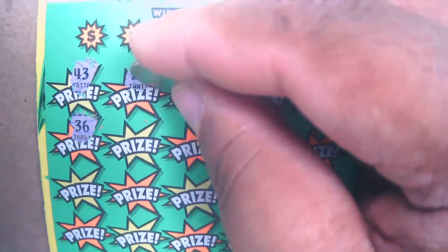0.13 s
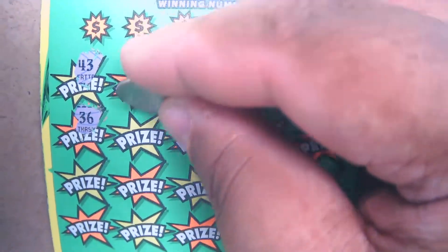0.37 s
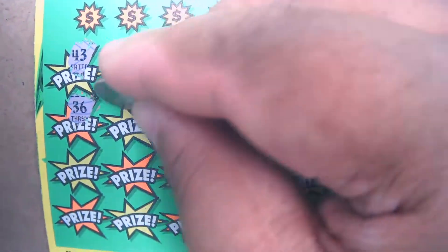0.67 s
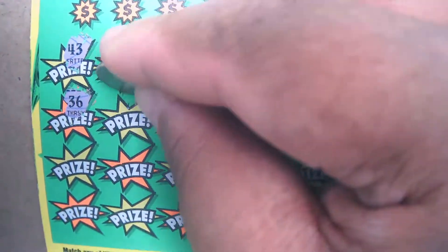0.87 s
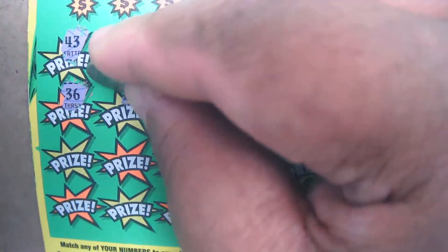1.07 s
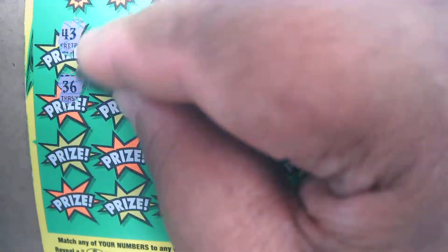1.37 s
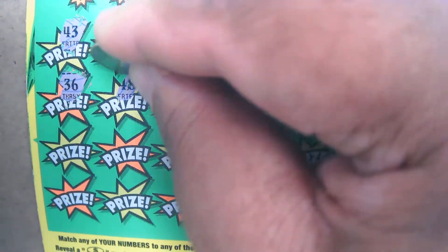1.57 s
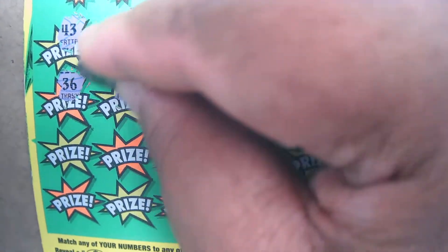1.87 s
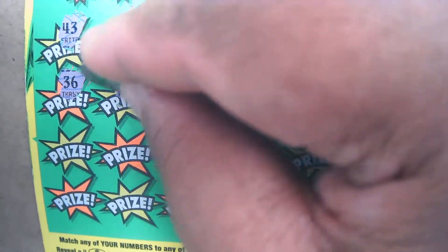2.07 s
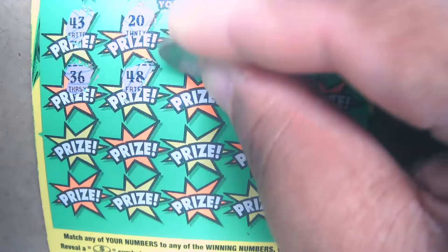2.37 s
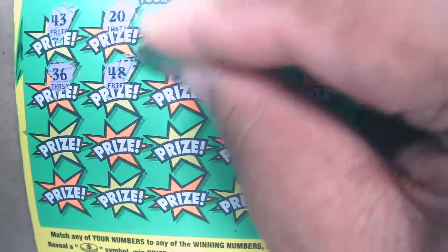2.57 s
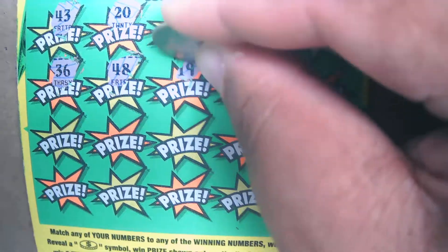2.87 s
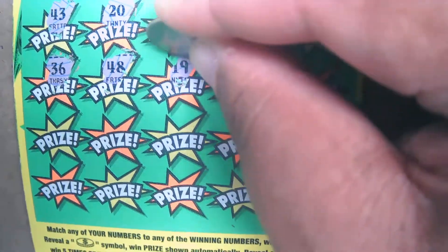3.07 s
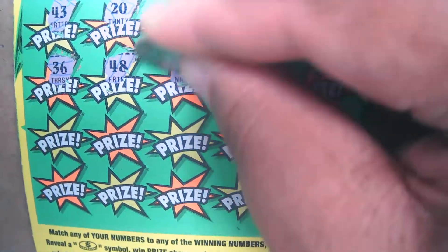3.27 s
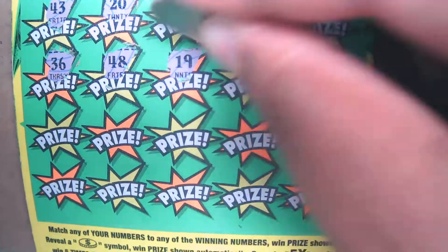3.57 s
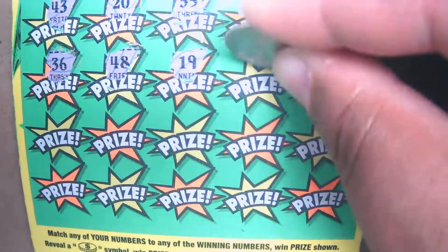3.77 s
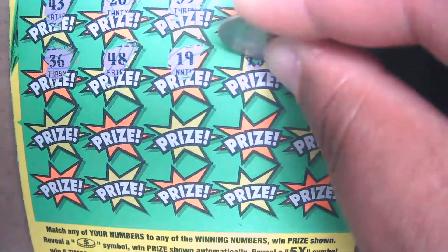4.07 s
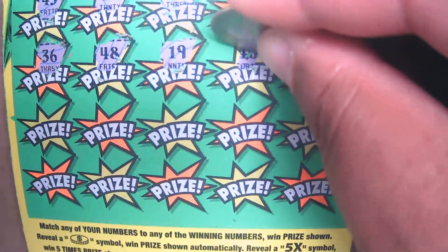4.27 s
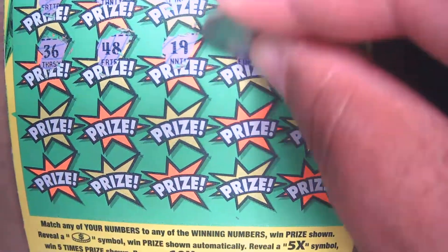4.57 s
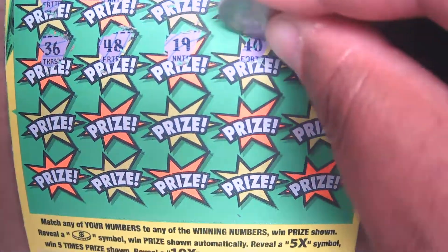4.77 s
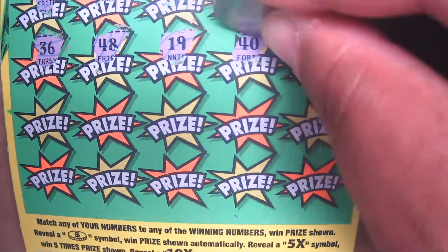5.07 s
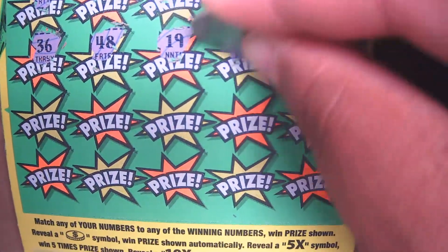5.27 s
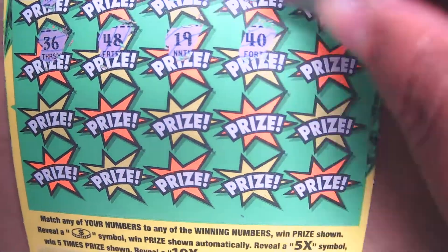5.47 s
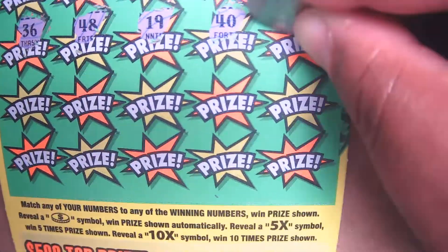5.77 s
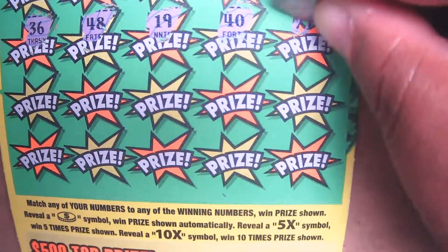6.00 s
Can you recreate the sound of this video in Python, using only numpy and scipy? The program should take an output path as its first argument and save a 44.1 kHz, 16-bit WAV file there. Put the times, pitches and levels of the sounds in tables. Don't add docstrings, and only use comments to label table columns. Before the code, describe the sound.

Very close to a phone microphone, a coin scratches the coating off a card ticket on a table. After a near-quiet start, quick paired strokes, a softer drag then a harder dig, come in several bursts separated by short gaps. Taps mark many burst starts, gritty crumbs hiss, the card rings woody in the midrange, and low ventilation hum lies beneath.

```python
import sys
import numpy as np
from scipy import signal
from scipy.fft import rfft, irfft
from scipy.io import wavfile
from scipy.ndimage import uniform_filter1d

SR = 44100
rng = np.random.default_rng(int(sys.argv[2]) if len(sys.argv) > 2 else 0)


def convert_level_to_amplitude(level_db):
    exponent = np.asarray(level_db, float) / 20
    return 10 ** exponent


def dump(signal):
    limited = np.clip(np.atleast_2d(signal).T, -1, 1)
    pcm = np.round(limited * 32767).astype(np.int16)
    wavfile.write(sys.argv[1], SR, pcm)


N = 270597
TIME = np.arange(N) / SR
SCATTER = irfft(np.exp(2j * np.pi * rng.random(33)))


def level(x, db):
    return x * convert_level_to_amplitude(db) / np.sqrt(np.mean(x ** 2))


def noise():
    return rng.standard_normal(N)


def ring(x, hz, width_hz):
    return signal.lfilter(*signal.iirpeak(hz, hz / width_hz, SR), x)


def band(x, lo_hz, hi_hz):
    return signal.sosfilt(signal.butter(4, [lo_hz, hi_hz], "band", fs=SR, output="sos"), x)


def colour(x, points):
    hz, db = np.transpose(points)
    grid_hz = np.fft.rfftfreq(8192, 1 / SR)
    curve_db = np.interp(np.log(grid_hz + 1), np.log(hz), np.maximum(db, -90))
    cepstrum = irfft(np.log(convert_level_to_amplitude(curve_db)))
    cepstrum[1:4096] *= 2
    cepstrum[4097:] = 0
    impulse = irfft(np.exp(rfft(cepstrum)))
    return signal.fftconvolve(x, impulse)[:N]


def slips(rate, spread_db):
    hit = rng.random(N) < rate / SR
    size = convert_level_to_amplitude(spread_db * rng.exponential(size=N))
    return level(hit * size * np.sign(noise()), 0)


def flutter(rate, depth_db):
    hold = int(SR / rate)
    steps = np.repeat(rng.standard_normal(N // hold + 1), hold)
    walk = uniform_filter1d(steps, hold)[:N]
    return level(convert_level_to_amplitude(depth_db * walk), 0)


def pushes(s, length, db, sharp, skirt_db, skirt, bite):
    power = np.zeros(N)
    for t, w, g in zip(s, length, db):
        near = slice(max(int((t - .3) * SR), 0), int((t + .3) * SR))
        u = (TIME[near] - t) / w
        edge = np.where(u < 0, sharp * bite, sharp)
        bump = np.exp(-abs(2 * u) ** edge)
        drag = convert_level_to_amplitude(2 * skirt_db) * np.exp(-abs(u) / skirt)
        power[near] += convert_level_to_amplitude(2 * g) * (bump + drag)
    return np.sqrt(power)


def clicks(s, db):
    x = np.zeros(N)
    x[(np.asarray(s) * SR).astype(int)] = convert_level_to_amplitude(db)
    return x


def strokes():
    # centre in seconds, length in seconds, level in dB, grit in dB
    drags = [(0.683, 0.019, -37.5, -61.5), (0.894, 0.024, -30.5, -47), (1.12, 0.049, -40, -55.5),
             (1.351, 0.027, -44.5, -58.5), (1.548, 0.018, -46.5, -59), (1.797, 0.038, -38.5, -53),
             (1.964, 0.028, -46, -57), (2.493, 0.026, -32, -51.5), (2.707, 0.028, -34, -50.5),
             (2.925, 0.03, -36.5, -56.5), (3.138, 0.038, -37.5, -51.5), (3.352, 0.039, -33.5, -49.5),
             (3.868, 0.033, -35, -55), (4.089, 0.036, -33.5, -55), (4.33, 0.081, -39, -59),
             (4.541, 0.035, -35, -56.5), (4.749, 0.023, -39, -56.5), (4.934, 0.043, -32, -50.5),
             (5.147, 0.033, -35, -55), (5.729, 0.028, -29, -53.5), (5.966, 0.034, -30.5, -54)]
    # centre in seconds, length in seconds, level in dB, grit in dB
    digs = [(0.761, 0.019, -26, -49.5), (0.973, 0.03, -32.5, -60), (1.175, 0.016, -30.5, -51),
            (1.202, 0.026, -30.5, -52), (1.445, 0.026, -37, -61), (1.592, 0.016, -45, -57),
            (1.858, 0.01, -40, -70), (2.564, 0.026, -23.5, -47), (2.781, 0.034, -28, -52.5),
            (2.983, 0.016, -27.5, -53), (3.21, 0.013, -32.5, -53), (3.465, 0.012, -39.5, -67),
            (3.938, 0.03, -28, -52), (4.157, 0.031, -28.5, -50), (4.412, 0.028, -34, -56),
            (4.62, 0.037, -33, -55), (5.01, 0.027, -43, -63), (5.229, 0.034, -44, -58),
            (5.812, 0.037, -28.5, -58), (6.042, 0.028, -30, -56)]
    # centre in seconds, level in dB
    catches = [(1.412, -40.5), (1.57, -42), (2.724, -35.5), (3.003, -43), (4.462, -39), (4.511, -37.5),
               (5.272, -44.5), (6.026, -31)]
    # time in seconds, steepness as tilt in dB, edge buzz in dB
    hold = [(0.7, -2, -25), (1.3, -2.5, -17), (1.9, -3, -19), (2.5, -1.5, -21), (3.3, -5.5, -19.5),
            (3.9, -1.5, -21.5), (4.4, 2.5, -26), (5.1, 1.5, -20), (5.8, -4.5, -24), (6.1, -0.5, -20)]
    snag_s, snag_grit_db = 0.01, -23.5
    snags = [(t, snag_s, db, db + snag_grit_db) for t, db in catches]
    # tilt dB, edge buzz dB, top octave of the grit minus lower treble dB
    ways = ((drags, (-6, -2.5, -5)), (digs, (5, 0, 0.5)), (snags, (-6, 0, 6)))
    rows = [tuple(row) + way for table, way in ways for row in table]
    s, length, db, grit_db, tilt_db, edge_db, top_db = np.transpose(sorted(rows))
    at, steep_db, buzz_db = np.transpose(hold)
    tilt_db = tilt_db + np.interp(s, at, steep_db)
    edge_db = edge_db + np.interp(s, at, buzz_db)
    return s, length, db, grit_db, tilt_db, edge_db, top_db


def card(x, tilt_db, flip):
    # centre in Hz, width in Hz, level in dB
    card_modes = [(863, 310, -11), (1058, 103, 1.5), (1242, 138, 3), (1412, 92, 9.5), (1638, 96, 5),
                  (1784, 75, 4.5), (1954, 123, 2.5), (2160, 130, -16), (2796, 570, -20.5)]
    out = 0
    for k, (hz, width_hz, db) in enumerate(card_modes):
        drive = x * convert_level_to_amplitude(1.18 * tilt_db * np.log2(hz / 1480))
        mode = ring(ring(drive, hz, width_hz), hz, 3.4 * width_hz)
        out = out + flip ** k * convert_level_to_amplitude(db) * mode
    return out


def ports(x):
    # centre in Hz, width in Hz, level in dB
    cavities = [(5280, 170, -1), (7070, 170, -0.5), (6270, 300, 3.5), (11900, 400, 11), (13600, 450, 0),
                (14220, 250, -20), (15300, 630, -3)]
    # frequency in Hz, density in dB per Hz
    treble_mid = [(1350, -18), (2300, 4.5), (2470, 4), (2660, 1.5), (3260, -27.5), (3920, -33), (5120, -7),
                  (5970, -18), (7020, -9), (10400, -30), (11200, -21), (12500, -27), (13200, -9.5),
                  (14800, -4.5), (15900, -3)]
    # frequency in Hz, density in dB per Hz
    treble_side = [(1400, -45), (2300, -5), (2900, -4), (3600, 4), (4300, -7.5), (4850, -9), (5400, -8.5),
                   (6620, -7), (7200, -15), (7780, -3), (9000, -21), (9900, -12), (11000, -19),
                   (15600, -1.5)]
    late = signal.fftconvolve(x, SCATTER)[:N]
    mid = x + sum(convert_level_to_amplitude(db) * ring(x, hz, w) for hz, w, db in cavities)
    return np.array([colour(mid, treble_mid), convert_level_to_amplitude(-1.0) * colour(-late, treble_side)])


def scrape():
    # start in seconds, peak in dB, treble in dB
    taps = [(0.754, -14, -25), (1.171, -25, -34), (1.2, -24, -22), (2.418, -6.5, -71), (2.557, -21, -30),
            (2.977, -9.5, -38), (3.208, -8.5, -50), (3.805, -10, -42), (4.41, -11.5, -36),
            (4.609, -20, -39), (5.653, -1.5, -40), (5.727, -16, -37), (4.141, -14, -38), (2.768, -19, -38),
            (3.926, -19, -38), (1.35, -30, -38), (2.926, -27, -38), (3.342, -38, -38), (4.737, -28, -38),
            (6.029, -9, -43)]
    s, length, db, _, tilt_db, edge_db, _ = strokes()
    catch = slips(9000, 2.3) * flutter(260, 1.8)
    shape = dict(sharp=1.94, skirt_db=-14.5, skirt=0.63, bite=1.46)
    unit = 1 / np.std(card(catch, 0, -1.016))

    t, peak_db, treble_db = np.transpose(taps)
    t = t + .0006
    blow = clicks(t, peak_db + 12.0)
    echo = sum(np.roll(blow, int(lag_s * SR)) for lag_s in (.0052, .0066, .0085))
    blow = blow + convert_level_to_amplitude(-35) * echo
    knock = band(ring(blow, 1350, 820), 710, 2180)
    knock = knock + convert_level_to_amplitude(-1) * card(blow, 0, 0.9) + convert_level_to_amplitude(-23) * ring(blow, 940, 420)

    pressed = catch * pushes(s, length, db, **shape)
    body = unit * card(pressed, np.interp(TIME, s, tilt_db), -1.014) + knock
    buzz = band(catch, 1950, 5200)
    buzz = buzz * pushes(s, length, db + edge_db, **shape) / np.std(ports(buzz))
    leak = convert_level_to_amplitude(-20) * band(body, 1630, 3000)
    snap = ring(band(clicks(t, peak_db + treble_db + 28), 4500, 17000), 6800, 6000)
    return np.array([body, leak]) + ports(buzz + snap)


def grit():
    # centre in seconds, length in seconds,
    # level in dB, top octave minus lower treble in dB
    slides = [(0.247, 0.085, -62.5, -5), (1.58, 0.11, -64, 3), (1.653, 0.029, -64, 1.5),
              (2.227, 0.037, -52, 2.2), (3.551, 0.021, -53.5, 1), (3.633, 0.18, -62.5, -1),
              (3.81, 0.074, -62, -13), (3.84, 0.19, -62, 3), (4.45, .45, -62.5, 0.5), (5.429, 0.03, -51, 2),
              (5.462, 0.077, -59, 0), (5.9, 0.39, -63, 0)]
    # start in seconds, peak in dB
    ticks = [(0.602, -36), (1.9618, -44), (2.4134, -40), (2.708, -33), (2.9795, -41), (3.21, -55),
             (3.5293, -41), (5.411, -36), (5.64, -34)]
    lag_s, share, extra_s = 0.0033, 0.81, 0.0024
    s, length, _, db, _, _, top_db = strokes()
    torn = [s + lag_s, share * length + extra_s, db, top_db]
    s, length, db, top_db = np.hstack([torn, np.transpose(slides)])
    grains = slips(14000, 2.0) * flutter(150, 2.4)
    out = 0
    for lo_hz, hi_hz, sign in ((4150, 10800, -1.48), (9600, 15160, 0.56)):
        part = band(grains, lo_hz, hi_hz)
        part_db = db + sign * top_db / 2 - 5.5
        push = pushes(s, length, part_db, sharp=1.9, skirt_db=-14.0, skirt=0.83, bite=1.5)
        out = out + part * push / np.std(ports(part))
    t, peak_db = np.transpose(ticks)
    tick = ring(ring(clicks(t, peak_db + 21), 6500, 4000), 6500, 6000)
    return ports(out + tick)


def rasp():
    # centre in seconds, length in seconds, level in dB
    rests = [(1.05, 0.3, -73.5), (3.0, 0.55, -72.5), (4.202, .12, -64), (4.47, 0.42, -62),
             (5.444, 0.24, -76), (5.9, .3, -73.5)]
    s, length, db = np.transpose(rests)
    grains = ring(slips(7000, 3.5) * flutter(83, 2.8), 3020, 900)
    grains = level(band(grains, 2200, 3600), 0)
    sound = grains * pushes(s, length, db, sharp=3.0, skirt_db=-30, skirt=0.6, bite=1.0)
    haze = level(card(noise(), 2.6, -0.95), 0)
    haze = haze * pushes(s, length, db + 14.5, sharp=2.4, skirt_db=-30, skirt=0.6, bite=0.85)
    return np.array([sound + haze, convert_level_to_amplitude(1) * np.roll(sound, 4)])


def thuds():
    # centre in seconds, length in seconds, level in dB, pitch in Hz
    bumps = [
        (3.83, .07, -39.5, 190),
        (3.83, .04, -46, 380),
        (5.658, .008, -41, 700),
        (5.98, .06, -48, 350),
        (3.0, .05, -47, 150),
    ]
    out = 0
    for t, w, db, hz in bumps:
        thump = level(band(noise(), .6 * hz, 1.5 * hz), db)
        out = out + thump * np.exp(-((TIME - t) / w) ** 2)
    return out


def room():
    # time in seconds, room level in dB, treble hiss level in dB
    drift = [(0.0, -44.5, -73), (0.34, -43, -71.5), (2.6, -43, -73), (4.55, -42.5, -73), (6.14, -42.5, -74)]
    # centre in Hz, width in Hz,
    # level in dB
    fan = [(24.4, 11, -50.5), (62.5, 11, -61), (113.6, 11.4, -52), (247.7, 12, -52.5), (393.5, 27, -57.5),
           (583, 26, -59), (1364, 170, -62.5), (1903, 23, -60)]
    # frequency in Hz, density in dB per Hz
    rumble_colour = [(8.8, -38), (15, -0.5), (33, -2), (60, -41), (104, -4.5), (227, -8.5), (269, -27),
                     (306, -14.5), (499, -15.5), (543, -13), (904, -24), (1030, -21.5), (1120, -22.5),
                     (1500, -16.5), (2400, -41), (3120, -87), (5280, -120)]
    hiss_colour = [(1410, -25), (2400, -44), (2560, 4.5), (3000, -19), (3270, -8.5), (3620, 1.5),
                   (3950, 2.5), (5090, -19.5), (6100, -2.5), (7040, -7.5), (7620, -13), (9580, -12.5),
                   (15900, -9)]
    side_colour = [(8.8, -30), (15, 3), (112, -7), (232, -17.5), (269, -13), (467, -18), (510, -16.5),
                   (1190, -25), (1500, -28), (1890, -16), (2390, -24.5), (3600, -10), (4670, -24.5),
                   (6830, -26.5), (15900, -28.5)]
    s, low_db, hiss_db = np.transpose(drift)
    air = level(colour(noise(), rumble_colour), 1.22) * convert_level_to_amplitude(np.interp(TIME, s, low_db))
    hum = sum(level(ring(noise(), hz, w), db) for hz, w, db in fan)
    hiss = convert_level_to_amplitude(np.interp(TIME, s, hiss_db))
    mid = air + hum + level(colour(noise(), hiss_colour), 7.6) * hiss
    side = level(colour(noise(), side_colour), -59.0) * hiss / np.mean(hiss)
    return np.array([mid, side])


def whine():
    return sum(level(ring(noise(), hz, 35), db) for hz, db in ((12655, -82), (14005, -90)))


def scene():
    mid, side = scrape() + grit() + rasp() + room()
    mid = mid + thuds()
    mid = mid - .72 * ring(mid, 3950, 1010)
    side = side + whine()
    return np.array([mid + side, mid - side])


def band_limit(x):
    return signal.sosfilt(signal.butter(12, 16580, fs=SR, output="sos"), x)


def record(dry):
    top_hz = 15740
    cut = signal.sosfilt(signal.ellip(10, .2, 70, top_hz, fs=SR, output="sos"), dry)
    return band_limit(cut)


dry = scene()
out = record(dry)
dump(out)
```